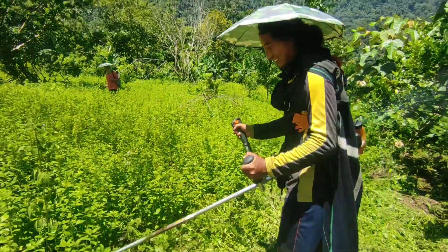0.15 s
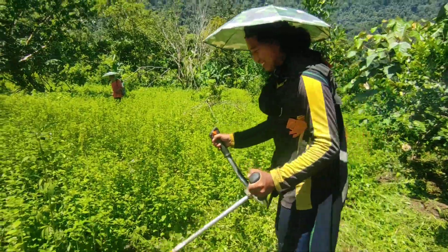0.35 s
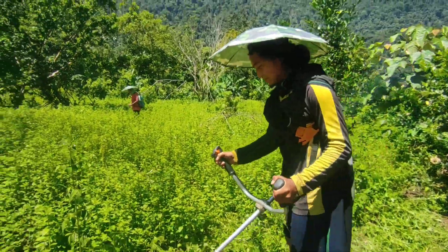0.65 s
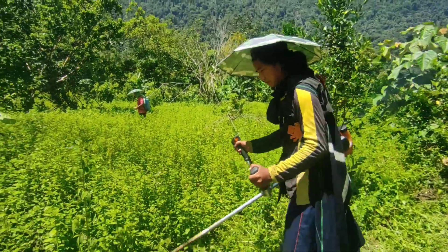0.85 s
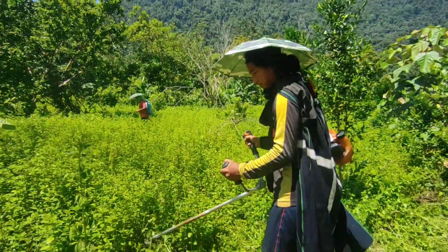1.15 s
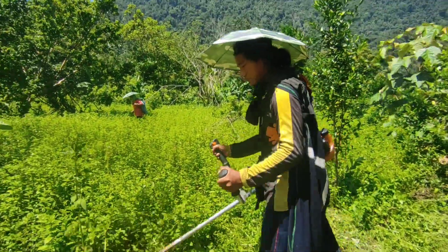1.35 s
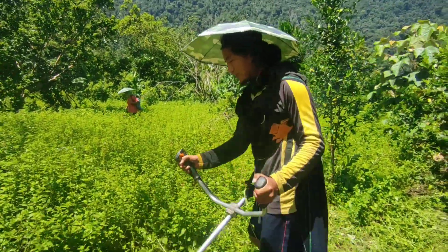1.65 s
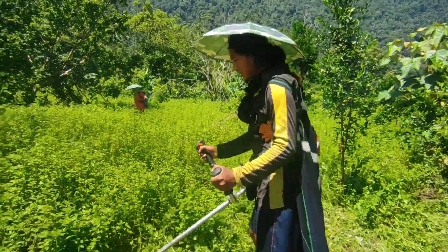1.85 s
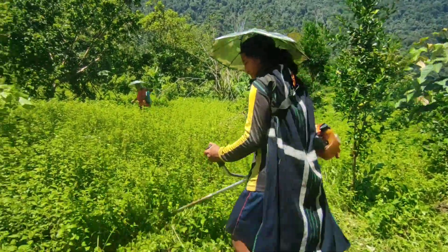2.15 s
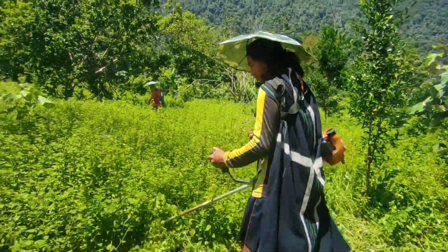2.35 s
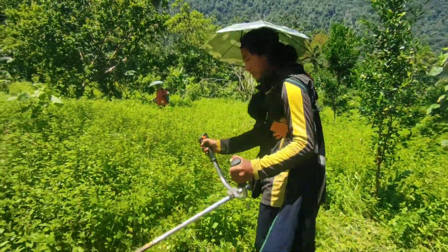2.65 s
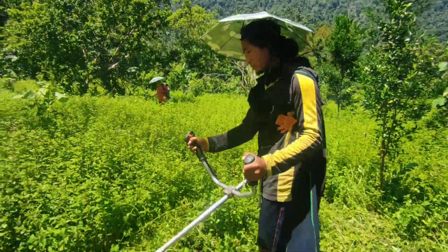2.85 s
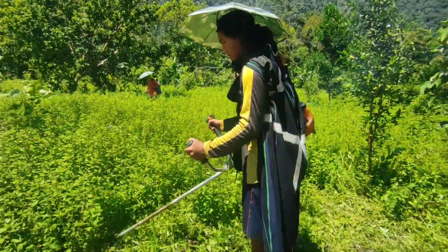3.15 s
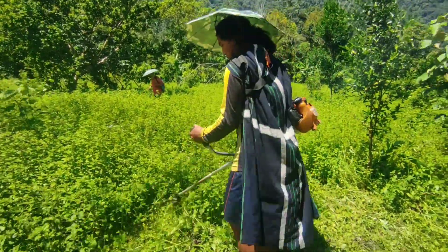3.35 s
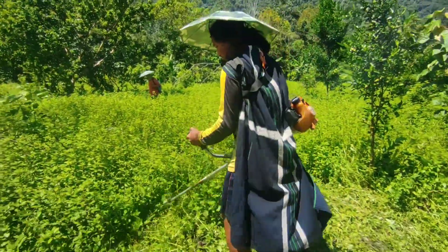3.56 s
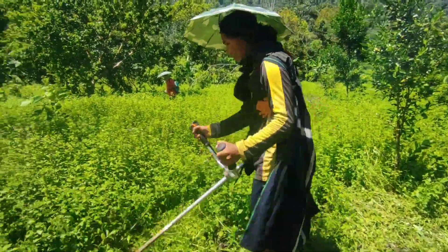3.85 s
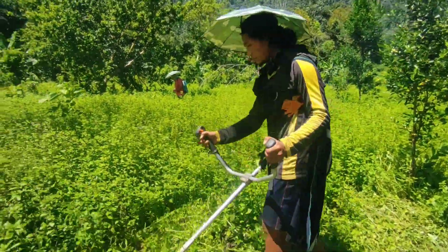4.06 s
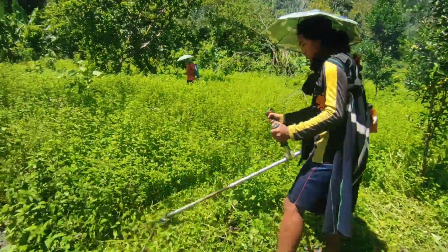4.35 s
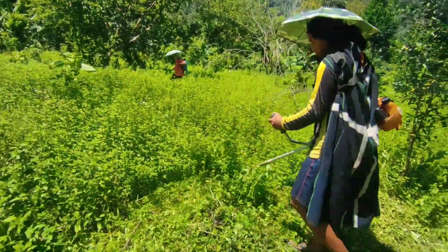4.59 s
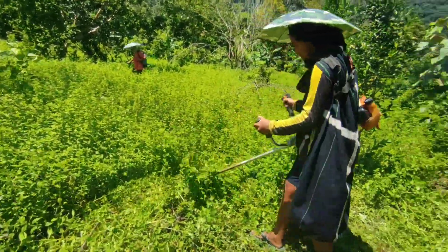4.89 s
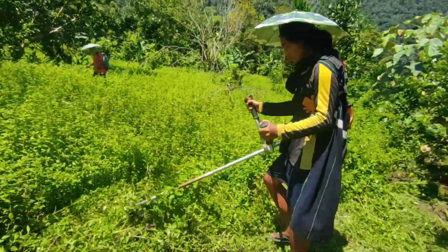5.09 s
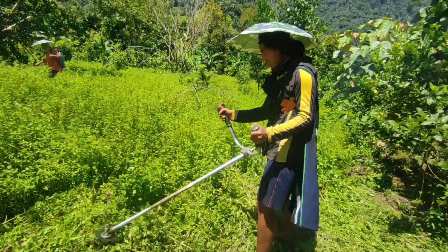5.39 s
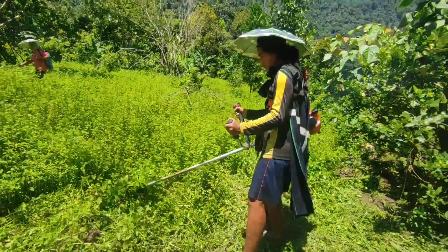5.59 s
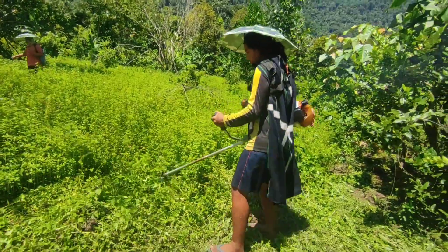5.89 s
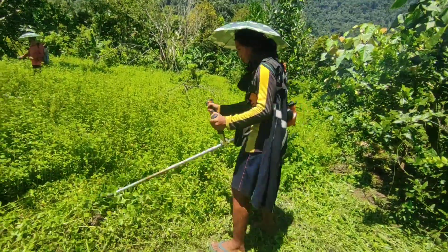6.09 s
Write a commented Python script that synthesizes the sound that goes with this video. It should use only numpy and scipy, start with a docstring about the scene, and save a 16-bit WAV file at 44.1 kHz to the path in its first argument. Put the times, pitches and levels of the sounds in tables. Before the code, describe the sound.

A two-stroke brush cutter runs at full throttle, its fluttering buzz mixed with the bright hiss of weeds being shredded.

```python
"""A two-stroke backpack brush cutter at full throttle in tall weeds, a few metres away.
The engine skips a firing every few turns, so its note flutters; it swells as the operator swings the
muffler round. Gas rushes with each puff and the block clatters. The head shreds leaves with a bright
hiss and its bevel gear whines. Woody stalks splinter; thick clumps tear with a low thump.
A raspy hiss swells softly now and then, and a light breeze rumbles underneath."""
import sys
import numpy as np
from scipy import signal
from scipy.fft import rfft, irfft, next_fast_len
from scipy.io import wavfile
from scipy.ndimage import uniform_filter1d

SR = 44100
rng = np.random.default_rng(int(sys.argv[2]) if len(sys.argv) > 2 else 0)


def to_wav(s):
    """Save 16-bit WAV."""
    ch = np.atleast_2d(s).T  # columns
    pcm = np.round(np.clip(ch, -1, 1) * 32767)  # PCM
    wavfile.write(sys.argv[1], SR, pcm.astype(np.int16))


N = 274743
TIME_S = np.arange(N) / SR

TOP_TURNS_PER_S, HUNT_TURNS_PER_S = 228.2, 0.201
SKIP_COST_TURNS, SURGE_TURNS, JITTER_TURNS = 0.06, 0.07, 0.003
CATCH_UP_S, POP_S = 0.009, 0.0099
ROUGH_DB, POP_SPREAD_DB = 0.7, 1.5
GAS_DB, GROUND_ECHO_DB = -30, -52
HISS_DB, RUSTLE_DB, LOAD_SPREAD_DB = -16.5, -24.5, 0.15
GEAR_TEETH, GEAR_PLAY_TEETH, HEAD_PER_CRANK = 17, 0.27, 17 / 21
WHINE_FLICKER_DB, SHAFT_DB, BREEZE_DB = 2.5, -59.5, -50.5
CUTOFF_HZ = 14900

# weeds drag the revs down: (time [s], length [s], loss [turns/s])
REV_SAGS = [(0.0, 0.069, 12.4), (.25, 0.055, 1.86), (.58, 0.19, 1.14), (1.02, 0.089, 7.53),
            (1.56, 0.12, 1.59), (2.12, 0.14, 4.26), (2.67, 0.11, 3.1), (3.08, 0.13, 2.7), (3.35, 0.19, 2.3),
            (4.02, 0.21, 4.6), (4.67, 0.21, 1.18), (5.12, 0.096, 1.6), (5.58, 0.078, 4.5),
            (6.23, 0.15, 2.5)]
# skipped firings: (time [s], rate [1/s])
MISFIRE_RATE = [(0.0, 35.1), (0.24, 36.4), (0.4, 29.7), (0.56, 34.2), (0.64, 39.7), (0.72, 27.3),
                (0.96, 39.1), (1.12, 19.3), (1.2, 39.8), (1.28, 26.0), (1.52, 37.0), (1.76, 35.4),
                (1.84, 26.0), (2.08, 44.3), (2.16, 19.9), (2.24, 48.9), (2.32, 23.8), (2.64, 37.4),
                (2.8, 28.0), (2.88, 39.5), (2.96, 22.6), (3.12, 45.6), (3.2, 26.8), (3.28, 27.4),
                (3.36, 44.6), (3.68, 25.8), (3.76, 40.3), (4.08, 27.2), (4.16, 35.2), (4.48, 27.8),
                (4.72, 46.1), (4.8, 20.5), (4.88, 35.3), (5.04, 30.6), (5.12, 40.1), (5.2, 27.1),
                (5.52, 26.8), (5.6, 19.9), (5.76, 33.8), (5.84, 25.0), (6.16, 29.7), (6.24, 68.4)]
# exhaust, one row per crank harmonic: (level [dB], delay [turns], pan left [dB], swing share [1],
# hum share [1], drone share [1], buzz share [1], sag loss [dB/(turn/s)], pop pitch [Hz], pop size [1])
EXHAUST_HARMONICS = [(-34.5, 0.59, 3, 0.83, 0.076, 0.25, 0.23, 0.17, 230, 0.25),
                     (-18.5, 0.13, 1, 0, 0.95, 0, 0, 0.07, 453.5, 0.64),
                     (-23, 0.075, 2.5, 0.71, 0, 0.17, 0.029, .3, 920, 0.2),
                     (-36.5, 0.0023, 6, 0.12, 0.25, 1, 0.093, 0.041, 1100, 0.12),
                     (-22.5, 0.5133, 2, 0.34, 0.062, 0.29, 0, 0.42, 1104, 0.85),
                     (-16, 0.5, 0.7, 0, 0.015, 0.33, 0.12, 0.45, 1357, 0.6),
                     (-24.5, 0.501, 0, 0.024, 0.076, 0.12, 1, 0.09, 1570, 0.96),
                     (-42.5, 0.46, 7, 0.02, 0, 0.13, 0.33, .1, 1800, 0.8)]
# outlet boom as the muffler swings, used about its mean: (time [s], level [dB])
SWING_DB = [(0.0, -36), (0.31, -26), (1.04, -32), (1.07, -28.5), (1.32, -23.5), (1.77, -31.5), (2.39, -24),
            (2.98, -32), (3.02, -33), (3.17, -27.5), (3.63, -22), (3.9, -24.5), (4.01, -31.5), (4.42, -35),
            (4.75, -25), (4.98, -24), (5.48, -40.5), (5.64, -40.5), (5.92, -30), (6.13, -35), (6.23, -34)]
# exhaust hum near 450 Hz, used about its mean: (time [s], level [dB])
HUM_DB = [(0, -18.5), (.35, -20.5), (.85, -20.5), (1.08, -19), (1.3, -17.5), (1.65, -20.5), (2.05, -20.5),
          (2.38, -14.5), (2.75, -21), (3.25, -20.5), (3.4, -16.5), (3.62, -15), (4.05, -21.5), (4.45, -19),
          (4.78, -15), (5.0, -15.5), (5.3, -20), (5.6, -20), (5.85, -14.5), (6.02, -13), (6.23, -19)]
# exhaust drone near 900 Hz, used about its mean: (time [s], level [dB])
DRONE_DB = [(0.0, -33.5), (0.7, -37), (1.04, -31), (1.35, -30.5), (1.7, -34), (1.98, -27.5), (2.45, -33),
            (2.87, -33), (3.25, -31), (3.63, -28), (4.32, -36.5), (4.49, -30), (4.88, -38), (5.15, -31.5),
            (5.45, -29.5), (5.79, -23.5), (6.04, -23), (6.23, -28)]
# exhaust buzz near 1600 Hz, used about its mean: (time [s], level [dB])
BUZZ_DB = [(0, -24), (.3, -19.5), (.75, -23.5), (1.1, -21.5), (1.45, -23), (1.8, -25.5), (2.1, -24.5),
           (2.44, -19), (3.05, -29.5), (3.35, -19.5), (3.6, -26.5), (3.85, -18.5), (4.0, -24.5), (4.3, -30),
           (4.6, -22.5), (4.86, -19.5), (5.46, -28), (6.23, -27)]
# gas in the puffs: (frequency [Hz], relative density [dB])
GAS_SPECTRUM = [(80, -16), (160, -14.5), (300, -10), (390, -1.5), (560, -7), (820, -7.5), (930, -4),
                (1020, 0.5), (1210, 3.5), (1330, -4.5), (1720, -4), (2400, -51)]
# block clatter and fan noise: (frequency [Hz], relative density [dB])
CLATTER_SPECTRUM = [(1800, 12.5), (2200, 12), (3000, 10.5), (4100, 9.5), (4600, -0.5), (5200, -14),
                    (6500, -12), (9000, 3)]
# block clatter: (time [s], level [dB])
CLATTER_DB = [(0, -27.5), (1.3, -26), (1.8, -24), (2.3, -24.5), (2.55, -25.5), (3.15, -25), (3.3, -21.5),
              (3.85, -21.5), (4.3, -31), (4.85, -24.5), (5.3, -33), (5.65, -28), (5.9, -22.5), (6.23, -26)]
# load on the head, low when clear of the weeds, used about its mean: (time [s], hiss level [dB])
LOAD_DB = [(0, -15.5), (.3, -18.5), (.45, -16), (1.04, -15.5), (1.25, -17), (1.65, -16), (2.0, -16),
           (2.33, -22.5), (2.5, -16.5), (2.67, -19.5), (2.8, -16), (3.3, -18), (3.62, -20.5), (3.88, -16.5),
           (4.42, -17), (4.84, -22), (5.12, -16), (5.25, -17.5), (5.42, -18.5), (5.62, -17), (5.77, -17.5),
           (5.85, -22), (6.0, -21.5), (6.15, -15), (6.23, -20.5)]
# shredded leaves: (frequency [Hz], left relative density [dB], right relative density [dB])
SHRED_SPECTRUM = [(1540, -10, -5.5), (2820, -6.5, -4), (3730, -13, -11.5), (4000, -5, -3.5),
                  (4850, -18.5, -11.5), (5230, -14, -13.5), (7140, -12.5, -8.5), (8040, -8.5, -3.5),
                  (9930, -5.5, 5), (11000, -4, -2), (11300, 2.5, -4), (12870, -7.5, -3),
                  (14160, -14.5, -22), (14700, -31, -31)]
# bevel gear: (multiple of tooth rate [1], left level [dB], right level [dB])
GEAR_HARMONICS = [(1, -55, -50), (2, -35, -37), (3, -26, -30.5)]
# the gear sings out: (time [s], length [s], rise [dB])
GEAR_SWELLS = [(.07, .1, 1), (.4, 0.11, 3), (1.62, 0.15, 9.5), (3.25, 0.06, 1), (5.255, 0.043, 5)]
# low rumble: (frequency [Hz], relative density [dB])
RUMBLE_SPECTRUM = [(20, 1.5), (50, -6), (100, -6.5), (200, -12), (500, -32)]
# low thumps as the head bites clumps, softer gusts between: (time [s], length [s], peak [dB])
THUMPS_AND_GUSTS = [(0.977, 0.04, -34), (2.184, 0.11, -43), (2.711, 0.13, -42), (3.062, 0.078, -32),
                    (3.525, 0.33, -40), (3.906, 0.13, -34), (4.125, 0.045, -30.5), (5.173, 0.091, -39),
                    (5.579, 0.11, -38)]
# woody stalks splinter: (time [s], length [s], peak [dB])
STALK_BREAKS = [(0.22, 0.069, -26), (1.97, 0.091, -31), (3.896, 0.035, -23), (3.988, 0.036, -45),
                (4.113, 0.062, -23)]
# splinter crackle: (frequency [Hz], relative density [dB])
SPLINTER_SPECTRUM = [(2000, -23), (3200, -18), (3900, 7), (4800, 4), (7000, -9)]
# the head bites a clump: (time [s], length [s], tearing level [dB], engine dip [dB])
CLUMP_BITES = [(0.966, 0.043, -18, 8), (2.632, 0.032, -18, 7), (3.044, 0.093, -16, 9),
               (3.91, 0.028, -15.5, 5.5), (3.992, 0.065, -19, 3), (4.11, 0.065, -18.5, 2.5),
               (5.522, 0.062, -21, 1)]
# tearing stalks: (frequency [Hz], relative density [dB])
TEAR_SPECTRUM = [(25, 9), (100, -11), (300, 4.5), (1300, 1.5), (2000, 8), (2800, -1), (3800, 3.5),
                 (6000, -10.5)]
# soft swells of raspy hiss: (time [s], length [s], peak [dB])
RASP_SWELLS = [(1.88, .5, -28), (2.87, .4, -28), (4.88, 0.55, -23.5)]
# raspy hiss: (frequency [Hz], relative density [dB])
RASP_SPECTRUM = [(4200, 2.5), (5200, -1), (6600, 1), (7400, -5)]


def from_db(db):
    """Decibels to gain."""
    return 10 ** (np.asarray(db) / 20)


def unit_rms(x):
    """Scale to rms 1."""
    return x / np.sqrt(np.mean(x ** 2) + 1e-20)


def in_time(curve):
    """A (time, value) curve at every sample."""
    return np.interp(TIME_S, *np.transpose(curve))


def about_mean(curve):
    """A curve at every sample, less its mean."""
    level = in_time(curve)
    return level - level.mean()


def swells(events, order=2):
    """One unit swell per (time, length, ..) row; higher order, flatter top."""
    return np.array([np.exp(-np.minimum(np.abs(2 * (TIME_S - time_s) / length_s), 10) ** order)
                     for time_s, length_s, *_ in events])


def summed(events):
    """Sum of (time, length, height) swells."""
    return np.array(events)[:, 2] @ swells(events)


def envelope(events, order=2):
    """Gain from (time, length, peak dB) swells."""
    return from_db(np.array(events)[:, 2]) @ swells(events, order)


def drift(corner_hz):
    """Low-passed random wander, rms 1."""
    hop, settle = 40, 2000
    pole = np.exp(-2 * np.pi * corner_hz * hop / SR)
    white = rng.standard_normal(N // hop + settle + 2)
    slow = signal.lfilter([1], [1, -2 * pole, pole * pole], white)[settle:]
    return np.interp(np.arange(N) / hop, np.arange(len(slow)), unit_rms(slow))


def colour(x, spectrum):
    """Shape x by a (Hz, dB) spectrum, steep past its ends; rms 1."""
    size = next_fast_len(N)
    hz = np.maximum(np.arange(size // 2 + 1) * SR / size, 1)
    points_hz, level_db = np.transpose(spectrum)
    gain = from_db(np.interp(np.log(hz), np.log(points_hz), level_db))
    gain *= np.minimum(1, np.minimum(hz / points_hz[0], points_hz[-1] / hz)) ** 6
    return unit_rms(irfft(rfft(x, size) * gain, size)[..., :N])


def stereo_noise(correlation):
    """Two-channel white noise."""
    mid, side = rng.standard_normal((2, N))
    return np.sqrt((1 + correlation) / 2) * mid + np.sqrt((1 - correlation) / 2) * side * [[1], [-1]]


def crackle(per_s, spread_db):
    """Random snaps of uneven size, independent per channel; rms 1."""
    sizes = from_db(spread_db * np.minimum(rng.exponential(1, (2, N)), 4))
    return unit_rms((rng.random((2, N)) < per_s / SR) * sizes * rng.choice([-1, 1], (2, N)))


def delayed(x, ms):
    """x arriving later."""
    return np.interp(TIME_S - ms / 1000, TIME_S, x)


def pan(left_db):
    """Gains: left up, right down by as much."""
    return from_db([[left_db], [-left_db]])


def crank():
    """Turns so far: full throttle, hunting a little, slowed by weeds and misfires."""
    skip_loss = SKIP_COST_TURNS * about_mean(MISFIRE_RATE)
    turns_per_s = TOP_TURNS_PER_S - summed(REV_SAGS) - skip_loss + HUNT_TURNS_PER_S * drift(5)
    return np.cumsum(turns_per_s) / SR


def misfires(turns):
    """Skipped firings [samples] and surge [turns]: puffs fall behind, then catch up at each skip."""
    firings = np.interp(np.arange(1, int(turns[-1])), turns, np.arange(N)).astype(int)
    per_s = in_time(MISFIRE_RATE)
    due = (np.cumsum(per_s) / SR + per_s / TOP_TURNS_PER_S)[firings]
    skips = firings[np.diff(np.floor(due), prepend=0) > 0]
    progress = np.interp(np.arange(N), skips, np.arange(len(skips))) % 1
    return skips, -SURGE_TURNS * uniform_filter1d(progress ** 3, int(CATCH_UP_S * SR))


def exhaust(turns):
    """Hard, fluttering note; each misfire pops in the muffler against it and cuts a short gap."""
    curves_db = np.array([about_mean(curve) for curve in (SWING_DB, HUM_DB, DRONE_DB, BUZZ_DB)])
    sag = summed(REV_SAGS)
    skips, surge_turns = misfires(turns)
    puff_turns = turns + surge_turns + JITTER_TURNS * drift(60)
    strength = from_db(ROUGH_DB * drift(83))
    pop_gains = from_db(POP_SPREAD_DB * rng.standard_normal((len(skips), 1)))
    offsets = np.arange(-int(POP_S * SR / 2), int(POP_S * SR / 2))
    pop_samples = np.clip(skips[:, None] + offsets, 0, N - 1)
    note = np.zeros((2, N))
    for multiple, row in enumerate(EXHAUST_HARMONICS, 1):
        level_db, delay_turns, left_db, *shares, sag_db, pop_hz, pop_size = row
        phase = 2 * np.pi * multiple * (puff_turns - delay_turns)
        tone = strength * np.cos(phase)
        pops = np.hanning(len(offsets)) * np.cos(phase[skips, None] + 2 * np.pi * pop_hz * offsets / SR)
        tone[pop_samples] -= pop_size * pop_gains * pops
        gain = from_db(level_db + np.dot(shares, curves_db) - sag_db * sag)
        note += np.sqrt(2) * tone * gain * pan(left_db)
    return note


def engine(turns):
    """Exhaust note and its ground echo, plus gas rush and block clatter pulsing once a turn."""
    left, right = exhaust(turns)
    direct = np.array([left, delayed(right, ms=0.077)])
    echo = from_db(GROUND_ECHO_DB) * np.array([delayed(left, ms=3.1), delayed(right, ms=5.3)])
    pulse = 1 + 0.5 * np.cos(2 * np.pi * turns)
    gas_db = GAS_DB + 0.027 * (about_mean(SWING_DB) + about_mean(DRONE_DB))
    gas = from_db(gas_db) * colour(stereo_noise(1) * pulse, GAS_SPECTRUM)
    rattle = stereo_noise(-0.75) + crackle(per_s=700, spread_db=1)
    clatter = from_db(in_time(CLATTER_DB)) * colour(rattle * np.sqrt(pulse), CLATTER_SPECTRUM)
    return direct + echo + gas + clatter


def cutting(turns, load_db):
    """Leaves and stems shred in dense snaps, slightly louder at the head's two passes a turn."""
    passes = 1 + 0.045 * np.cos(4 * np.pi * HEAD_PER_CRANK * turns)
    grains = stereo_noise(-0.02) + 0.72 * crackle(per_s=2500, spread_db=-0.5)
    grains *= passes * from_db(1.5 * drift(23))
    spectra = np.array(SHRED_SPECTRUM)
    shred = np.array([colour(grains[side], spectra[:, [0, 1 + side]]) for side in (0, 1)])
    leaves = unit_rms(signal.sosfilt(signal.butter(4, 7000, "high", fs=SR, output="sos"), shred))
    stems = unit_rms(signal.sosfilt(signal.butter(4, 7000, "low", fs=SR, output="sos"), shred))
    hiss = from_db(HISS_DB + load_db) * leaves * pan(left_db=-0.5)
    rustle = from_db(RUSTLE_DB + 0.67 * load_db + drift(22)) * stems
    return hiss + rustle


def gear(turns, load_db):
    """Bevel teeth mesh unevenly: a narrow, wavering whine, louder under load."""
    mesh_phase = 2 * np.pi * (GEAR_TEETH * turns + GEAR_PLAY_TEETH * drift(35))
    whine = np.zeros((2, N))
    for multiple, *sides_db in GEAR_HARMONICS:
        swell_db = WHINE_FLICKER_DB * drift(1.2) + load_db + summed(GEAR_SWELLS)
        for side, level_db in enumerate(sides_db):
            tone = np.sqrt(2) * np.cos(multiple * mesh_phase + drift(16))
            whine[side] += from_db(level_db + swell_db) * tone
    return whine


def shaft(turns):
    """The slightly unbalanced head hums at its turning rate."""
    return from_db(SHAFT_DB + 2 * drift(2.6)) * np.sqrt(2) * np.cos(2 * np.pi * HEAD_PER_CRANK * turns)


def rumble():
    """Faint breeze; low thumps as the head bites clumps, softer gusts between."""
    gain = from_db(BREEZE_DB) + envelope(THUMPS_AND_GUSTS)
    return gain * colour(stereo_noise(0.11), RUMBLE_SPECTRUM) * pan(left_db=2.2)


def splintering():
    """Woody stalks break in bursts of very uneven snaps."""
    return envelope(STALK_BREAKS) * colour(crackle(per_s=1100, spread_db=10), SPLINTER_SPECTRUM)


def tearing():
    """Thick clumps rip in abrupt bursts of noise and snaps."""
    rip = stereo_noise(0.33) + crackle(per_s=2900, spread_db=3)
    return envelope(CLUMP_BITES, order=8) * colour(rip, TEAR_SPECTRUM)


def rasp():
    """Soft swells of raspy hiss around 4-7 kHz."""
    return envelope(RASP_SWELLS) * colour(crackle(per_s=2600, spread_db=2.5), RASP_SPECTRUM)


def scene():
    """Engine, head and rumble; at each bite the engine dips and tearing takes over."""
    turns = crank()
    load_db = about_mean(LOAD_DB) + LOAD_SPREAD_DB * drift(11)
    dip_db = np.array(CLUMP_BITES)[:, 3] @ swells(CLUMP_BITES, order=8)
    motor = engine(turns) * from_db(-dip_db)
    head = cutting(turns, load_db) + gear(turns, load_db) + shaft(turns)
    return motor + head + tearing() + splintering() + rasp() + rumble()


def record(dry):
    """Clip at full scale, then low-pass."""
    lowpass = signal.ellip(10, 0.05, 60, CUTOFF_HZ, fs=SR, output="sos")
    return signal.sosfiltfilt(lowpass, np.clip(dry, -1, 1))


dry = scene()
out = record(dry)
to_wav(out)
```